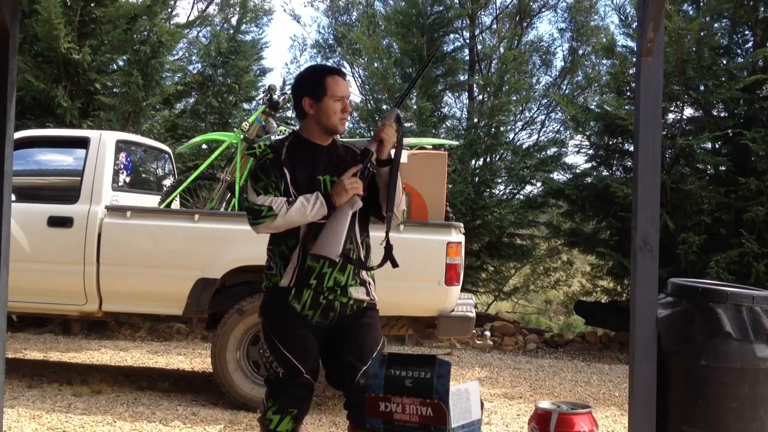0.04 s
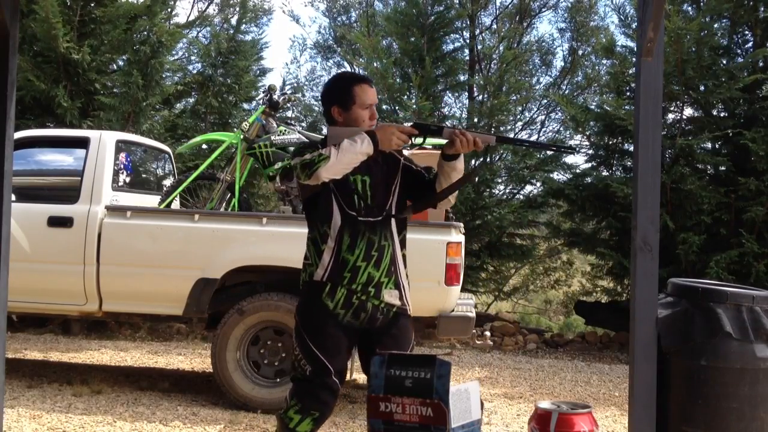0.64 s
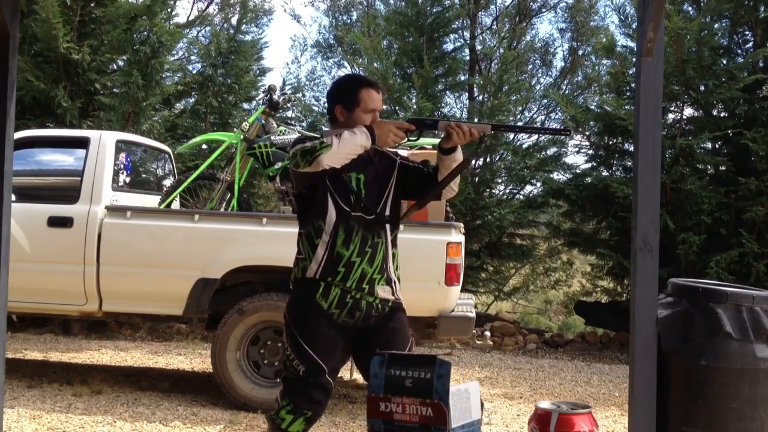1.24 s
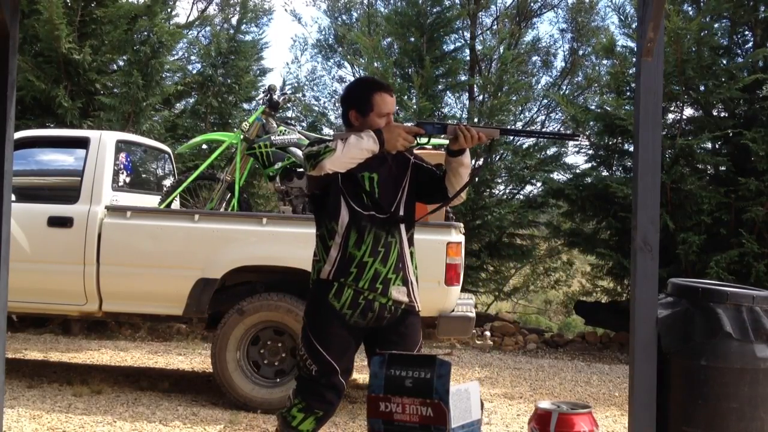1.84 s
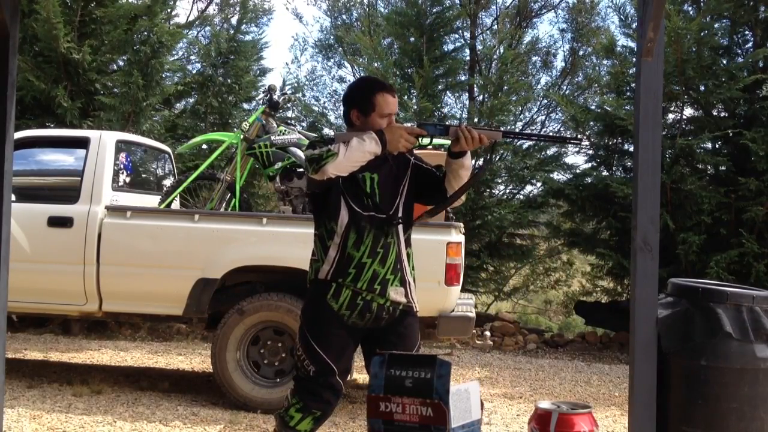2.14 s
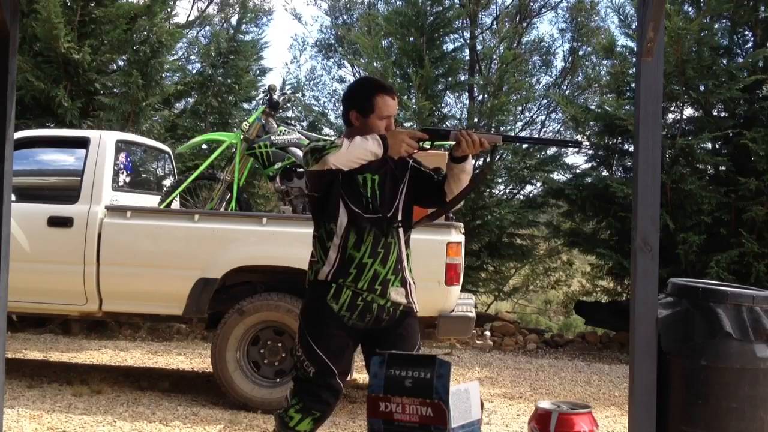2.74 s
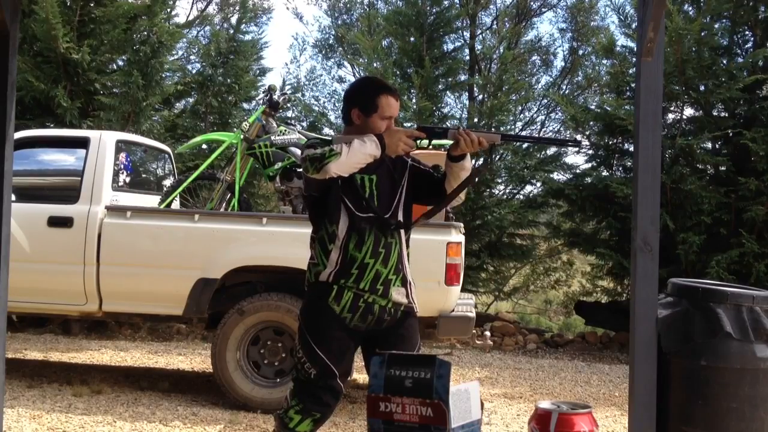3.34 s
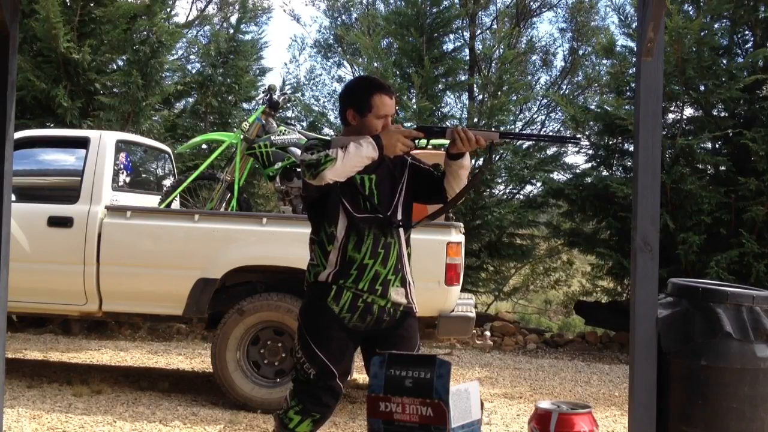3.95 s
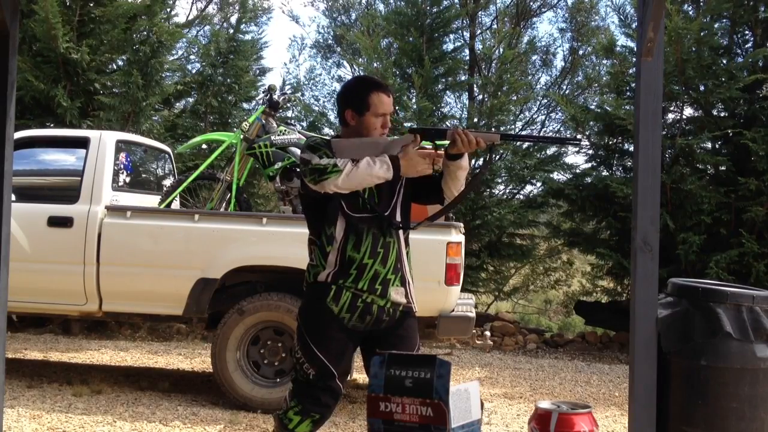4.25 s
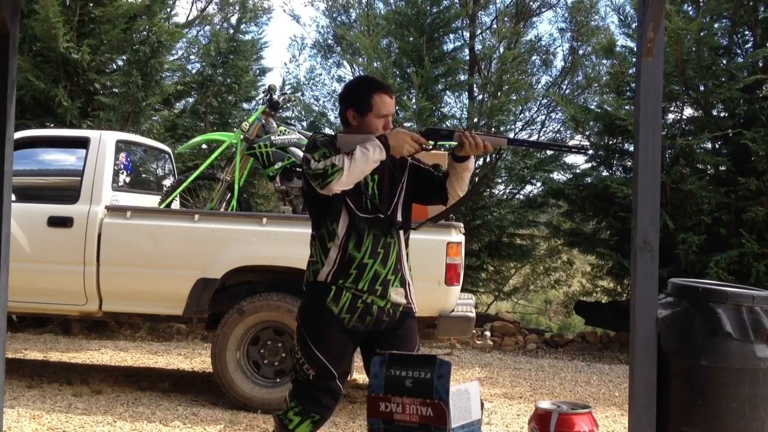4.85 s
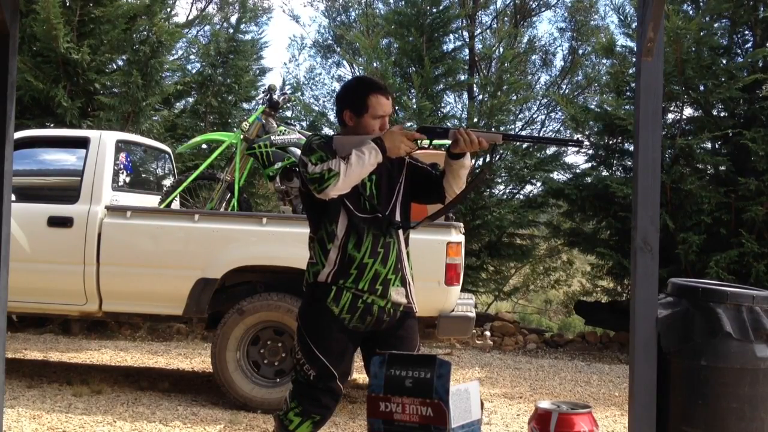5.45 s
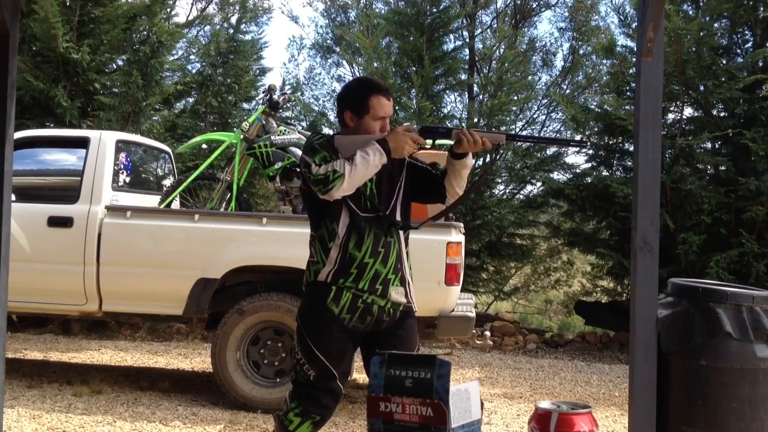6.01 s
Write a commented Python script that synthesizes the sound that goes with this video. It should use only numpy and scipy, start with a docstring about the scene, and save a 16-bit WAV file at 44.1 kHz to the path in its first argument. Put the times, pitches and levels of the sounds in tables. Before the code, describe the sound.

After quiet outdoor background noise, a small lever-action rifle is cycled with metallic clacks and fired, two times.

```python
"""In a gravel yard, under an open shed, a small-calibre lever rifle is cycled and fired twice.
Each shot is a pressure pulse; each lever stroke is friction and impacts that ring steel parts.
Both reflect off the ground and the walls and reverberate under the roof. Behind them are outdoor air,
a far steady engine, a few bird chirps, rustling clothes, soft scuffs and hollow knocks.
The shots drive an automatic gain control down, and the level creeps back."""
import sys
import numpy as np
from scipy import signal
from scipy.fft import rfft, irfft, next_fast_len
from scipy.io import wavfile
from scipy.ndimage import map_coordinates

SR = 44100
rng = np.random.default_rng(int(sys.argv[2]) if len(sys.argv) > 2 else 0)


def to_wav(sig):
    """Store sig (one row per channel, or 1-D mono) as 16-bit WAV at the path in sys.argv[1].

    Samples outside -1..1 are clipped; the rate is SR.
    """
    pcm = np.clip(np.atleast_2d(sig), -1, 1) * 32767
    pcm = np.round(pcm).astype(np.int16)
    wavfile.write(sys.argv[1], SR, pcm.T)  # frames by channels


N = 268128


def amp(db):
    """Amplitude ratio of a level in decibels."""
    return 10 ** (np.asarray(db) / 20)


def unit_rms(x):
    """Normalisation to an rms of 1."""
    return x / np.sqrt(np.mean(x ** 2) + 1e-20)


def seconds(length):
    """Uniformly sampled time axis."""
    return np.arange(int(length * SR)) / SR


def curve_at(points, hz):
    """Interpolation of (Hz, value) points over log frequency."""
    knots_hz, values = np.transpose(points)
    return np.interp(np.log(hz + 1), np.log(knots_hz + 1), values)


def add(track, start, x):
    """Superposition of x on the track from a start in seconds."""
    part = track[max(round(start * SR), 0):][:len(x)]
    part += x[:len(part)]


def filtered(x, response):
    """Zero-phase filtering: the spectrum times a frequency response."""
    size = next_fast_len(len(x) + SR // 4)
    return irfft(rfft(x, size) * response(np.fft.rfftfreq(size, 1 / SR)), size)[:len(x)]


def noise(spectrum, size):
    """Spectral shaping of white noise, at rms 1."""
    return unit_rms(filtered(rng.standard_normal(size), lambda hz: amp(curve_at(spectrum, hz))))


def wobble(rate):
    """Smooth random modulation, with rate knots a second."""
    return map_coordinates(rng.standard_normal(int(N * rate / SR) + 4), [np.arange(N) * rate / SR])


# Ground and wall echoes. Each row: delay in seconds, relative gain in dB.
ECHO_PATHS = [(.0033, -22.5), (0.0104, 0.5), (.0120, -9)]

def reflected(x, echo_db):
    """Early reflection: delayed copies join the direct sound."""
    out = x.copy()
    for delay, db in ECHO_PATHS:
        add(out, delay, amp(db + echo_db) * x)
    return out


# The shed's decay. Each row: frequency in Hz, reverberation time in seconds.
SHED_T60 = [(150, 0.3), (600, .29), (2500, 0.29), (6000, 0.24), (14000, 0.18)]

def shed_tail(spectrum, build_s):
    """Reverberation of energy 1: reflections multiply, then die away, treble first."""
    hz, t, bins = signal.stft(noise(spectrum, SR), SR, nperseg=256)
    decay = amp(-60 * t / curve_at(SHED_T60, hz)[:, None])
    tail = signal.istft(bins * decay, SR, nperseg=256)[1]
    tail *= 1 - np.exp(-(np.arange(len(tail)) / SR / build_s) ** 2)
    return tail / np.linalg.norm(tail)


def in_shed(x, wet_db, direct_db=0):
    """Convolution with the shed's impulse response adds a diffuse field."""
    tail = shed_tail([(100, -3), (4000, -1), (15000, -3)], build_s=0.003)
    return amp(direct_db) * x + amp(wet_db) * signal.fftconvolve(x, tail)[:len(x)]


# Outdoor air. Each row: frequency in Hz, relative spectral density in dB.
AIR_SPECTRUM = [(20, -34), (45, -13.5), (75, -15), (105, -12), (130, -8.5), (190, -3), (330, -5.5),
                (400, -9.5), (560, -5.5), (950, -17.5), (1400, -21), (1900, -26.5), (2900, -30),
                (4000, -37), (7000, -41), (9500, -47.5), (15000, -37.5)]

def outdoor_air(level_db=-54.5, flutter_db=0.25):
    """Ambient noise: broadband and nearly stationary."""
    return amp(level_db + flutter_db * wobble(8)) * noise(AIR_SPECTRUM, N)


# The engine's hum. Each row: multiple of the firing rate, relative level in dB.
HUM_HARMONICS = [(5, -60), (6, -66.5), (8, -60), (10, -71), (11, -61), (12, -66), (13, -62.5), (14, -59),
                 (16, -72), (17, -67.5), (18, -63.5), (20, -63.5), (22, -68.5), (24, -67.5), (26, -72.5)]
# Its upper harmonics. Each row: frequency in Hz, relative level in dB.
CLATTER_SPECTRUM = [(450, -21), (560, -9.5), (720, -0.5), (1000, 0), (1150, -14.5), (1350, -2.5),
                    (1900, -15), (2500, -21.5), (2900, -15), (3600, -36.5)]

def engine(firing_hz=25.98, drift=0.001986, waver_db=1.5, hum_db=-1.73, clatter_db=-65):
    """Periodic firing gives a harmonic series; the hum wavers on its long way through the air."""
    firings = firing_hz * np.cumsum(1 + drift * wobble(1.2)) / SR
    hum = np.zeros(N)
    for order, db in HUM_HARMONICS:
        harmonic = np.sqrt(2) * np.sin(2 * np.pi * (order * firings + rng.random()))
        hum += harmonic * amp(db + waver_db * wobble(2.984))
    orders, cycle = np.arange(21, 125), np.linspace(0, 1, 4096)
    strengths = amp(curve_at(CLATTER_SPECTRUM, orders * firing_hz) + rng.normal(0, 4.9, len(orders)))
    phases = np.outer(orders, cycle) + rng.random((len(orders), 1))
    rattle = strengths @ np.sin(2 * np.pi * phases)
    clatter = np.interp(firings % 1, cycle, rattle)  # the same rattle at every firing
    return amp(hum_db) * hum + amp(clatter_db) * unit_rms(clatter)


# Bird notes. Each row: start and length in seconds, first and last pitch in Hz, level in dB.
BIRD_NOTES = [(1.392, 0.04, 1996, 4640, -61), (1.70, .03, 2980, 3200, -68), (1.778, .05, 4220, 3980, -70.5),
              (5.029, 0.044, 1960, 4200, -54)]

def birds(roughness=0.034):
    """Frequency modulation: short whistles glide, slightly unsteady in pitch."""
    out = np.zeros(N)
    for start, length, first_hz, last_hz, db in BIRD_NOTES:
        progress = seconds(length) / length
        glide = first_hz + (last_hz - first_hz) * progress ** 1.4
        pitch = glide * (1 + roughness * wobble(600)[:len(progress)])
        swell = amp(db) * np.sin(np.pi * progress) ** 2
        add(out, start, swell * np.sin(2 * np.pi * np.cumsum(pitch) / SR))
    return in_shed(out, wet_db=-3.5, direct_db=-2)


def friction(strokes, spectrum, grain_db):
    """Sliding friction: grainy noise swells and fades with each stroke."""
    t = np.arange(N) / SR
    swell = sum(amp(db) * np.exp(-2 * ((t - peak) / length) ** 2) for peak, length, db in strokes)
    return swell * unit_rms(noise(spectrum, N) * amp(grain_db * wobble(150)))


# Rustles and scuffs. Each row: peak time and length in seconds, level in dB.
CLOTH_STROKES = [(.03, 0.08, -67.5), (.54, 0.24, -68.5), (.98, .07, -71), (1.18, 0.1, -67.5),
                 (1.47, 0.15, -73)]
SCUFF_STROKES = [(5.912, 0.016, -47.5), (5.934, 0.013, -52), (5.955, 0.017, -51), (5.985, 0.14, -56)]
# Their spectra. Each row: frequency in Hz, relative spectral density in dB.
CLOTH_SPECTRUM = [(800, -19), (2000, 2.5), (3800, -2), (7000, -14), (11000, -20)]
SCUFF_SPECTRUM = [(300, -13), (1000, -1), (1800, 5.5), (2800, -2), (4000, -15.5), (10000, -46)]

def handling():
    """Friction of clothes and sling as the rifle is shouldered, and later soft scuffs."""
    rustles = friction(CLOTH_STROKES, CLOTH_SPECTRUM, grain_db=1)
    return rustles + friction(SCUFF_STROKES, SCUFF_SPECTRUM, grain_db=-0.5)


def ring(modes, t):
    """Free vibration of damped modes, at new strengths for every blow."""
    return sum(amp(db + rng.normal(0, 2) - 60 * t / t60) * np.sin(2 * np.pi * hz * t)
               for hz, db, t60 in modes)


# Dull knocks. Each row: start in seconds, level in dB, number of contacts.
KNOCKS = [(1.191, -47, 2), (1.55, -50, 1), (1.74, -49.5, 1), (2.09, -50.5, 1), (3.408, -38, 3)]
# The hollow body. Each row: mode frequency in Hz, relative level in dB, T60 in seconds.
HOLLOW_MODES = [(88, -11, 0.17), (123.5, 0, 0.17), (162, 3, 0.12), (282, 4, 0.1)]

def knocks(flight_s=0.051, flight_ratio=0.48, loss_db=4, rise_s=0.0028):
    """Inelastic impacts on a hollow body: some bounce, each time sooner and weaker."""
    out, t = np.zeros(N), seconds(0.4)
    onset = 1 - np.exp(-t / rise_s)
    for start, db, contacts in KNOCKS:
        for bounce in range(contacts):
            add(out, start, amp(db - loss_db * bounce) * ring(HOLLOW_MODES, t) * onset)
            start += flight_s * flight_ratio ** bounce
    return out


# The lever swings down. Each row: start and end in seconds; unlatching, cocking and end stop in dB.
LEVER_OPENINGS = [(4.2154, 4.3008, -47, -36, -22), (5.5697, 5.633, -39.5, -39.5, -34)]
# It swings back. Each row: start and end in seconds; carrier lift, cartridge feed and bolt lock in dB.
LEVER_CLOSINGS = [(4.422, 4.498, -42.5, -40.5, -39.5), (5.6946, 5.755, -39.5, -35, -36.5)]

def lever_motion(cock_share=0.435, feed_share=0.85, ticks=2):
    """Linkage kinematics: each stroke times three contacts, loose ticks and two bolt scrapes."""
    contacts, scrapes = [], []
    for strokes, share in [(LEVER_OPENINGS, cock_share), (LEVER_CLOSINGS, feed_share)]:
        for start, end, start_db, middle_db, stop_db in strokes:
            middle = start + share * (end - start)
            # Each contact: time in seconds, level in dB, relative steel ring in dB.
            contacts += [(start, start_db, 0.5), (middle, middle_db, -8), (end, stop_db, -2.5)]
            for late_share in 0.5 + 0.5 * (np.arange(ticks) + rng.random(ticks)) / (ticks + 1):
                tick_db = middle_db + rng.normal(-10, 0.5)
                contacts.append((start + late_share * (end - start), tick_db, 0.5))
            scrapes.append((start + 0.0089, 0.03, start_db - 9.5))  # the bolt breaks loose
            scrapes.append((end, 0.04, middle_db - 7))  # and runs home
    return contacts, scrapes


# The rifle's steel parts. Each row: mode frequency in Hz, relative level in dB, T60 in seconds.
STEEL_MODES = [(558, -5, 0.042), (1510, -7.5, 0.044), (2820, -4.5, 0.047), (3240, 6, 0.016),
               (3330, -6, 0.031), (4630, -6, 0.033), (7070, -3, 0.032), (8340, -2.5, .01),
               (14200, -11, .008)]
# Contact noise. Each row: frequency in Hz, relative spectral density in dB.
CLACK_SPECTRUM = [(88, -48), (200, -30), (430, -10), (540, -5), (700, 0), (1080, -5.5), (1500, 0),
                  (2300, -4), (3200, -1.5), (4000, -10), (7000, -13), (8600, -11), (10000, -20),
                  (15400, -16)]

def lever(crack_t60=0.024, crack_db=-3, shed_db=3.5):
    """Impact excitation: gritty cracks briefly ring the steel, and the bolt scrapes along its track."""
    contacts, scrapes = lever_motion()
    out = in_shed(friction(scrapes, CLACK_SPECTRUM, grain_db=3), wet_db=-2, direct_db=-0.5)
    t = seconds(0.5)
    for start, db, ring_db in contacts:
        crack = noise(CLACK_SPECTRUM, len(t)) * amp(db - 60 * t / crack_t60)
        rush = np.linalg.norm(crack) * shed_tail(CLACK_SPECTRUM, build_s=0.0046)
        steel = amp(db + ring_db - 4.5) * ring(STEEL_MODES, t)
        add(out, start, amp(crack_db) * reflected(crack, echo_db=1))
        add(out, start, amp(shed_db) * rush)
        add(out, start, in_shed(steel, wet_db=-3.5))
    return out


# The scattered blast. Each row: frequency in Hz, relative spectral density in dB.
REPORT_SPECTRUM = [(35, -50.5), (60, -29), (130, -12), (230, -4.5), (310, 0.5), (410, -6), (600, 0),
                   (950, -3), (1200, -2.5), (1500, -5.5), (2000, -2.5), (3400, -5.5), (4300, -11),
                   (7000, -16.5), (9700, -22.5), (15400, -15)]

def scatter(t60, cutoff_hz=20000):
    """Scattering: a dying cloud of small echoes, of energy 1, dulled by distance."""
    t = seconds(0.8)
    cloud = filtered(noise(REPORT_SPECTRUM, len(t)), lambda hz: 1 / (1 + (hz / cutoff_hz) ** 2))
    cloud *= amp(-60 * t / t60)
    return cloud / np.linalg.norm(cloud)


# The shots. Each row: time in seconds; gains of blast, gas thump, near scatter and shed ring in dB.
RIFLE_SHOTS = [(5.1353, 18.5, 0, 9.5, 20), (6.0306, 24, 1, 24.5, 13.5)]

def shots(push_s=0.00007, suction_s=0.00049, thump_hz=195, thump_t60=0.028):
    """Blast wave: a pressure spike and its rarefaction, followed by a gas thump and echoes."""
    out, t = np.zeros(N), seconds(0.8)
    pressure = np.exp(-t / push_s) - push_s / suction_s * np.exp(-t / suction_s)
    blast = signal.lfilter(*signal.butter(2, 4800, fs=SR), pressure)
    thump = np.sin(2 * np.pi * thump_hz * t) * amp(-60 * t / thump_t60)
    for start, db, thump_db, scatter_db, shed_db in RIFLE_SHOTS:
        add(out, start - 0.0005, amp(db - 19.5) * blast)  # air driven out ahead of the bullet
        add(out, start, amp(db) * reflected(blast, echo_db=-3))
        add(out, start + 0.00088, amp(thump_db) * thump)
        add(out, start + 0.001003, amp(scatter_db) * scatter(t60=0.39))  # off nearby things
        add(out, start + 0.019, amp(shed_db) * shed_tail(REPORT_SPECTRUM, build_s=0.011))
        add(out, start + 0.12, amp(shed_db - 27) * scatter(t60=1.0, cutoff_hz=2000))  # off the trees
    return out


def scene():
    """Linear superposition of the rifle and the yard, in mono."""
    return (handling() + shots() + lever() + knocks() + birds() + engine() + outdoor_air())[None]


def record(dry, threshold_db=-14, depth_db=9, release_db_per_s=5, attack_s=0.0015, ceiling=0.7):
    """Compression: peaks pull the gain down and it creeps back; spikes saturate; the band is limited."""
    x = dry[0]
    excess_db = np.clip(20 * np.log10(np.abs(x) + 1e-9) - threshold_db, 0, depth_db)
    recovery_db = release_db_per_s * np.arange(N) / SR
    held_db = np.maximum.accumulate(excess_db + recovery_db) - recovery_db
    pole = np.exp(-1 / (attack_s * SR))
    x = x * amp(-signal.lfilter([1 - pole], [1, -pole], held_db))
    x = x / (1 + (x / ceiling) ** 4) ** (1 / 4)  # soft saturation
    x = signal.lfilter(*signal.butter(1, 85, 'highpass', fs=SR), x)
    return filtered(x, lambda hz: 1 / (1 + (hz / 15550) ** 160))[None]  # steep treble cut


dry = scene()
out = record(dry)
to_wav(out)
```